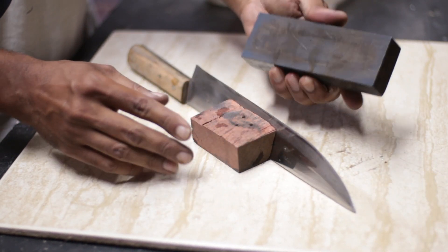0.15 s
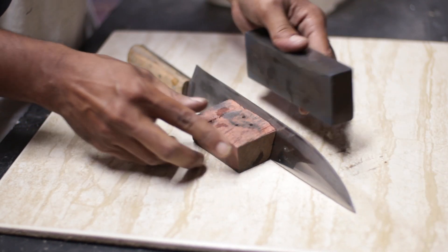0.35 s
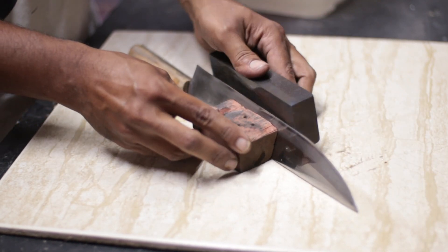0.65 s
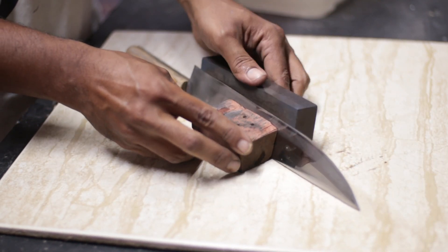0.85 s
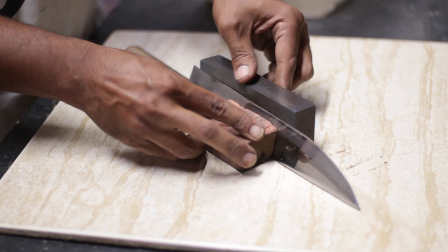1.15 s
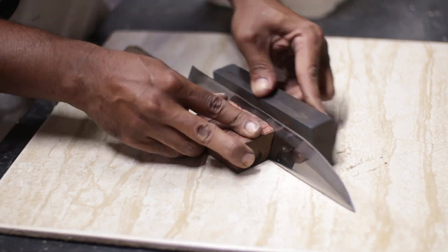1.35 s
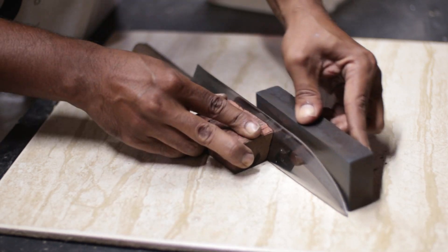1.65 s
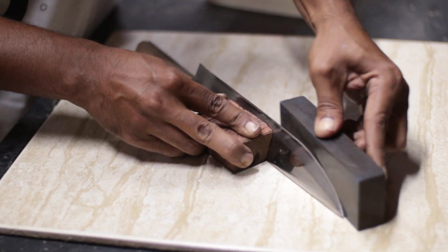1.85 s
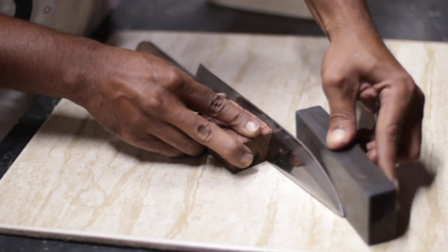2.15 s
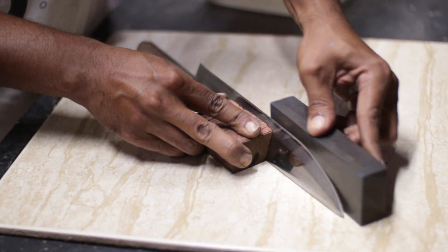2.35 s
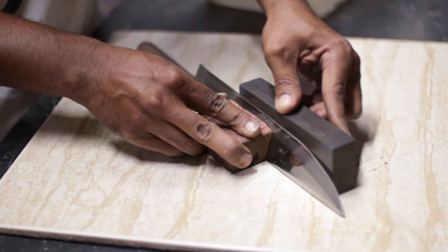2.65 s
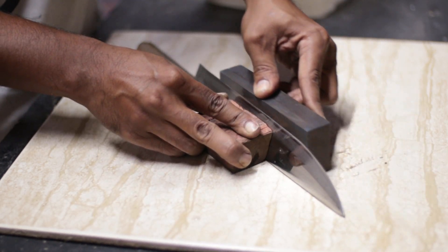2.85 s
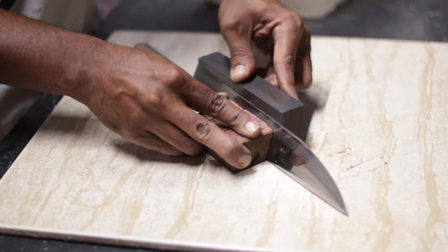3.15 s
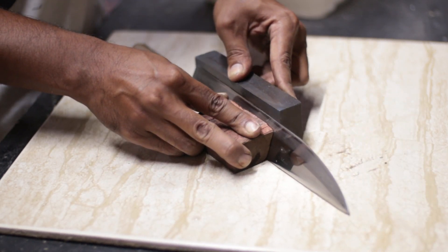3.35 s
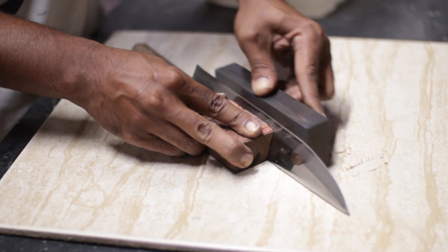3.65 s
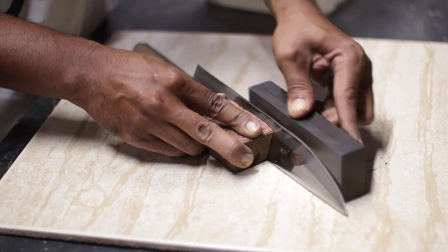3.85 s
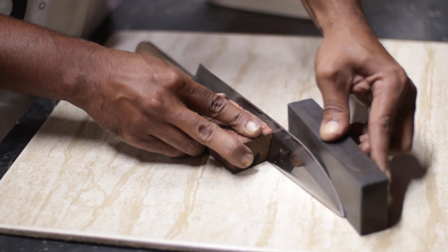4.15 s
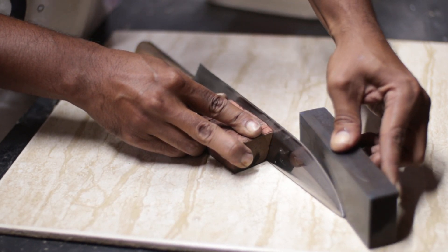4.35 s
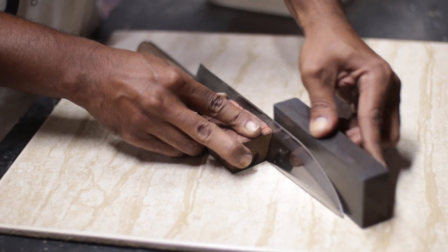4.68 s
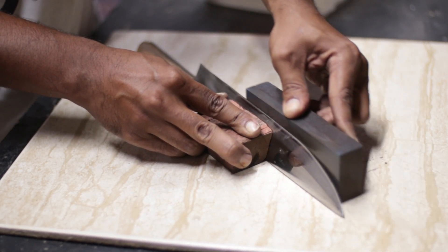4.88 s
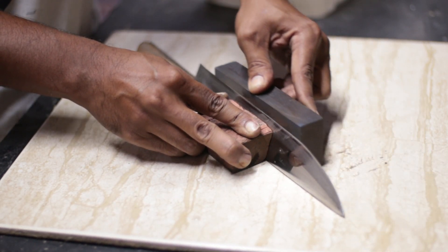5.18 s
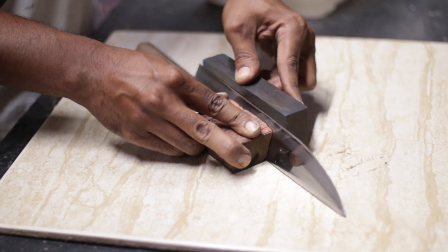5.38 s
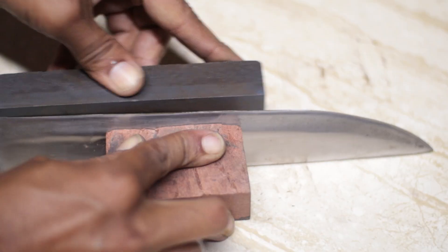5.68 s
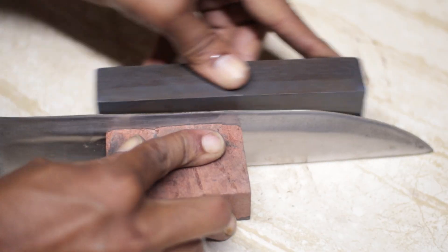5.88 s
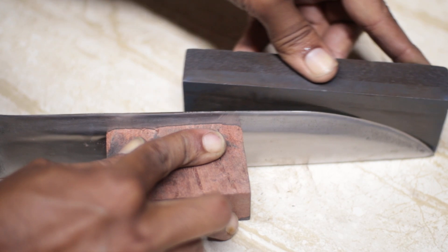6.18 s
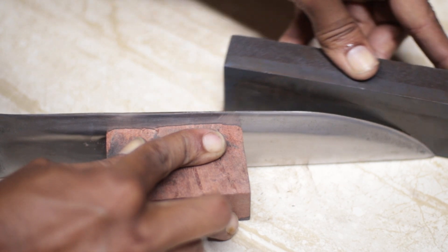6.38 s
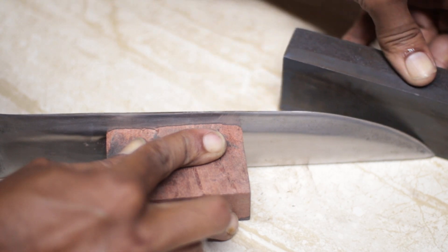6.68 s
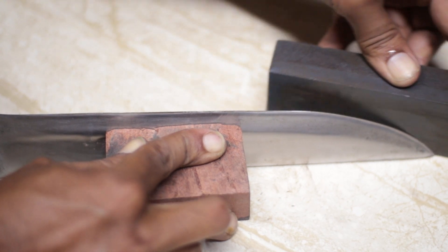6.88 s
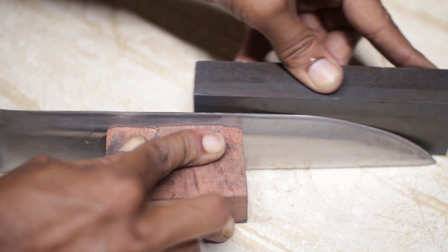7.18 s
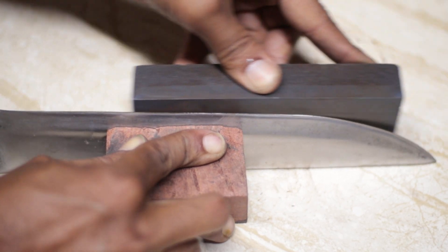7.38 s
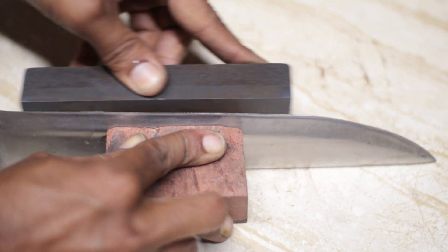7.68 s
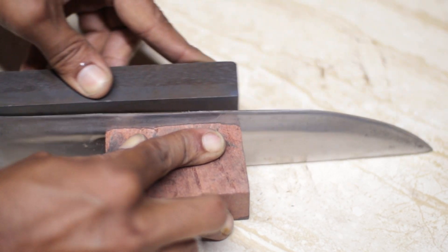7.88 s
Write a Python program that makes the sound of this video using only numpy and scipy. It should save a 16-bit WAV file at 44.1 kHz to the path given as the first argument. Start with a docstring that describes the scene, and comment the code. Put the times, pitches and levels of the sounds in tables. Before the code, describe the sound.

After one sharp hard knock, a whetstone rasps back and forth on a steel blade, six slow strokes with bright metallic fizz over faint hush.

```python
"""Small hard room: a sharpening stone is set down on a cutting board with light touches and one sharp
knock, then drawn six times along the edge of a knife held down under a small brick.
Random grain impulses drive the spectra of board, blade and edge; moving resonances add the hollow note
and the edge's ring. Gliding notes make the chatter, filtered impulses and noise bursts the contacts.
Early reflections and a diffuse tail answer, over a steady background hush."""
import sys
import numpy as np
from scipy import signal
from scipy.fft import rfft, irfft
from scipy.io import wavfile
from scipy.ndimage import uniform_filter1d, minimum_filter1d

SR = 44100
rng = np.random.default_rng(int(sys.argv[2]) if len(sys.argv) > 2 else 0)


def store_pcm(level_fs):
    """Save levels as 16-bit WAV."""
    pcm = np.round(np.clip(level_fs, -1, 1) * 32767).astype(np.int16)
    wavfile.write(sys.argv[1], SR, np.atleast_2d(pcm).T)


N = 354123

# The edge bites into the stone: its fizz flares and its ring takes a pitch of its own.
# Each row: centre in s, half length in s, fizz gain in dB, ring pitch at the centre in Hz, glide in Hz/s.
BITES = [(1.659, 0.068, 1, 11700, 26008), (2.29, 0.047, 6, 11800, 4), (2.743, 0.075, 1.5, 12770, 4),
         (3.185, 0.045, 6, 12900, -2), (4.007, .03, 10.5, 13800, 1.5), (4.1, 0.038, 9, 12200, 40010),
         (5.106, 0.0526, 3.5, 13460, 0), (5.399, 0.16, 6, 11430, -3), (6.145, .07, 0.5, 11830, 8000),
         (6.774, 0.017, 13.5, 13980, -1), (7.768, .05, 4, 11220, 0)]


def strokes():
    """Pressure makes the scrape louder and brighter; the sliding grip flutters, most in the treble."""
    # How hard the stone presses, one list per stroke. Each row: time in s, pressure as grit level in dB.
    pressure = [
        [(1.48, -68.5), (1.68, -53.5), (1.78, -59), (1.81, -53.5), (1.95, -65), (2.06, -56.0), (2.2, -61),
         (2.31, -57.0), (2.37, -63)],
        [(2.5, -71), (2.53, -61.5), (2.71, -62.0), (2.86, -65), (3.0, -57.5), (3.18, -58), (3.36, -66.5),
         (3.5, -67.5), (3.53, -70.5)],
        [(3.86, -70.5), (3.89, -63.0), (3.99, -53), (4.17, -61.0), (4.31, -56.0), (4.46, -65.5), (4.56, -62),
         (4.61, -65.0), (4.68, -71.5)],
        [(4.87, -66.5), (4.95, -59.5), (5.11, -59.0), (5.16, -62), (5.24, -62.5), (5.34, -52.5), (5.4, -63),
         (5.47, -58.5), (5.65, -68)],
        [(6.0, -67.5), (6.03, -61.5), (6.15, -50.5), (6.29, -61.5), (6.35, -57.5), (6.63, -68.5), (6.75, -72.5),
         (6.96, -70.5), (7.0, -67.5)],
        [(7.12, -68.5), (7.15, -73), (7.33, -65), (7.38, -59.5), (7.45, -68.5), (7.62, -65.5), (7.76, -52.5),
         (7.84, -55), (8.02, -55)],
    ]
    # The stone drags and its rasp swells. Each row: centre in s, half length in s, board gain in dB.
    drags = [(1.72, 0.11, 5), (1.86, 0.11, 4.5), (2.61, 0.16, 4), (3.0, .04, 6.5), (3.96, 0.112, 0),
             (4.61, 0.041, 1), (4.97, 0.083, 5.5), (6.24, 0.092, 3), (6.4, 0.074, 0.5), (6.92, 0.077, 3.5),
             (7.44, 0.14, -0.5), (7.23, 0.12, 7), (8.01, 0.071, 7.5)]
    usual_pressure_db, usual_grit_db = -60, -58.5
    # dB per dB of pressure; pressure damps the hollow note
    board_follows, blade_follows, fizz_follows, hollow_follows = 0.24, 0.46, 1.06, -0.21
    drag_blade_share = 0.65

    sliding, board_db, blade_db, fizz_db, hollow_hz, hollow_db = stroke_motion()
    press_db = in_time(np.concatenate(pressure))[0] - usual_pressure_db
    drag_db = flares(drags)
    grit_db = usual_grit_db + press_db
    board_db = board_db + board_follows * press_db + drag_db
    blade_db = blade_db + blade_follows * press_db + drag_blade_share * drag_db
    fizz_db = fizz_db + fizz_follows * press_db + flares(BITES)
    hollow_db = hollow_db + hollow_follows * press_db

    low = rasp(board_db, blade_db, grit_db, hollow_hz, hollow_db)
    high = hiss(grit_db, fizz_db, edge_pitch(press_db))
    grip = drift(26)
    return sliding * (low * from_db(1.4 * grip) + high * from_db(1.45 * grip))


def stroke_motion():
    """Each stroke starts, slides and stops; it holds its own levels while its hollow note glides."""
    # Out to the tip and back in turn; relative levels at the usual pressure.
    # Each row: start in s, end in s, board rasp in dB, blade rasp in dB, edge fizz in dB,
    # hollow note at the start in Hz, at the end in Hz, hollow note relative to the board rasp in dB.
    stroke_rows = [(1.44, 2.411, -49, -52, -58.5, 698, 936, -11.5),
                   (2.465, 3.569, -50.5, -54, -54.5, 800, 740, -2),
                   (3.815, 4.716, -49, -51.5, -57, 780, 1001, -14),
                   (4.83, 5.689, -50.5, -54, -55, 1002, 729, -3),
                   (5.965, 7.034, -51, -51.5, -55, 1044, 1030, -2.5),
                   (7.085, 8.1, -51.5, -54, -56, 1078, 980, -5)]
    attack_s, release_s = 0.032, 0.057
    glide_share = 0.65  # part of a stroke after which the hollow note has settled

    t = np.arange(N) / SR
    sliding, corners = np.zeros(N), []
    for start, end, board_db, blade_db, fizz_db, start_hz, end_hz, hollow_db in stroke_rows:
        sliding += np.clip(np.minimum((t - start) / attack_s, (end - t) / release_s), 0, 1)
        settled = start + glide_share * (end - start)
        for s, hz in ((start, start_hz), (settled, end_hz), (end, end_hz)):
            corners.append((s, board_db, blade_db, fizz_db, hz, hollow_db))
    return sliding, *in_time(corners)


def rasp(board_db, blade_db, grit_db, hollow_hz, hollow_db):
    """Coarse grit shakes the board and the flat of the blade."""
    # Spectra. Each row: frequency in Hz, level in dB.
    board_spectrum = [(150, -45.5), (330, -23.5), (430, -12.5), (540, -14.5), (660, 3), (770, 2), (900, 1),
                      (1100, 1.5), (1350, -1.5), (1550, -7), (2000, -25)]
    blade_spectrum = [(1200, -31.5), (1550, 0), (1900, -1), (2400, 0), (2800, -1.5), (3300, -3),
                      (3700, -14.5), (4800, -35.5)]

    coarse = grains(per_s=6000, spread_db=2.5)
    shaken = rms_one(through(coarse, pulse_of(board_spectrum)))
    hollow = from_db(hollow_db) * moving_ring(hollow_hz, width_hz=87)
    ringing = from_db(-35) * rms_one(through(coarse, body_ring()))
    board = rms_one(shaken + hollow + ringing)

    blade_pulse = pulse_of(blade_spectrum)
    dull, full = [rms_one(through(grains(per_s=6000, spread_db=3.5), blade_pulse)) for _ in range(2)]
    dull = signal.sosfilt(signal.butter(8, 2450, fs=SR, output="sos"), dull)
    # little hiss relative to the blade level leaves the upper part of its rasp quiet
    bright = np.clip(0.44 + 0.048 * (grit_db - blade_db + 6.0), .03, 1)
    blade = np.sqrt(1 - bright) * dull + np.sqrt(bright) * full
    return board * from_db(board_db) + blade * from_db(blade_db + 1.55)


def hiss(grit_db, fizz_db, ring_hz):
    """Fine grit cuts the edge, whose modes catch and let go one by one."""
    # Spectra. Each row: frequency in Hz, level in dB.
    grit_spectrum = [(2800, -33), (3700, 2), (4400, 7), (4950, -2.5), (5600, 2), (6500, -3.5), (7900, 3.5),
                     (8500, 3), (9800, 0), (11500, -21.5)]
    fizz_spectrum = [(8000, -41.5), (10000, -2.5), (11700, 4.5), (13000, 7.5), (14500, 7.5), (15800, 9)]
    # Edge modes that move together. Each row: multiple of the ring pitch, width in Hz, level in dB.
    edge_modes = [(0.801, 180, -17), (1.001, 190, -7), (1.09, 220, -11), (1.198, 260, -13)]

    fine = grains(per_s=5400, spread_db=2.0)
    edge_hz = ring_hz * (1 + 0.013 * drift(18))
    edge = np.zeros(N)
    for multiple, width_hz, db in edge_modes:
        edge += from_db(db + 0.73 * drift(29)) * moving_ring(multiple * edge_hz, width_hz)
    # the ring fades in and out by chance and stands out around a bite
    chance_db = 2 - 0.5 * drift(11)
    bite_db = 4 * sum(bell(s, 2 * half_s) for s, half_s, *_ in BITES)
    edge = edge * from_db(chance_db + bite_db)

    grit = rms_one(through(fine, pulse_of(grit_spectrum)))
    grit = rms_one(grit + from_db(-3.5) * squeaks(4600, 10000, count=1000))
    fizz = rms_one(through(fine, pulse_of(fizz_spectrum)))
    fizz = rms_one(fizz + edge + from_db(-10.5) * squeaks(10500, 15600, count=450))
    return grit * from_db(grit_db - 2.0) + fizz * from_db(fizz_db + 4.05 + 2.6 * drift(97))


def edge_pitch(press_db):
    """The edge's ring sinks under pressure and wanders, until a bite draws it to its own glide."""
    usual_hz, sag_hz_per_db, wander_hz, wanders_per_s = 12400, 112, 360, 1.3
    t = np.arange(N) / SR
    ring_hz = usual_hz - sag_hz_per_db * press_db + wander_hz * drift(wanders_per_s)
    for s, half_s, _, hz, glide in BITES:
        pull = np.minimum(2 * bell(s, 2 * half_s), 1)
        ring_hz = ring_hz + pull * (hz + glide * (t - s) - ring_hz)
    return ring_hz


def squeaks(low_hz, high_hz, count):
    """Single grains plough the steel for a moment, each squeaking at its own pitch; rms 1."""
    # columns as in swells
    lowest, highest = [0, .008, low_hz, -10, -6000], [N / SR, .04, high_hz, 0, 6000]
    return rms_one(swells(rng.uniform(lowest, highest, (count, 5)), flutter_hz=90))


def grains(per_s, spread_db):
    """Abrasive grains catch at random, most of them small and a few large."""
    sizes = from_db(spread_db * np.minimum(rng.exponential(1, N), 5))
    signs = rng.choice([-1, 1], N)
    return sizes * signs * (rng.random(N) < per_s / SR)


def chatter():
    """Spells of stick and slip: high on the blade, low in the board."""
    # The stone chatters on the steel; the board groans softly as the weight on it shifts.
    # Each row: centre in s, half length in s, pitch in Hz, level in dB, glide in Hz/s.
    chatters = [(1.66, 0.066, 2740, -50.5, 0), (1.72, 0.029, 2440, -51, 0),
                (1.812, 0.02, 4316, -50, -30000), (2.02, 0.13, 2600, -54.5, 997.5),
                (2.08, 0.21, 2110, -57, -6), (3.08, 0.023, 4550, -59.5, 4.5), (3.13, 0.32, 2414, -56, 398),
                (4.25, 0.11, 2650, -54.5, 1798), (4.27, 0.2, 2126, -53, -1500),
                (5.122, 0.03, 2838, -53, -3), (5.36, 0.098, 4532, -57.5, 4), (5.356, 0.055, 1980, -54, 0),
                (5.42, 0.21, 2440, -58, 5), (7.12, 0.039, 8500, -70, 0)]
    groans = [(1.83, 0.094, 210, -68.5, 300), (1.87, 0.05, 530, -54, -1.5), (7.38, 0.052, 516, -60, 0)]
    return swells(chatters, flutter_hz=54.8) + swells(groans, flutter_hz=35.3)


def blows():
    """Each contact gives a dull thud and a gritty crack; touches and flat landing ring the modes."""
    # Light touches and coarse grains catching. Each row: time in s, thud impulse in dB, crack impulse in dB.
    touch_rows = [(.796, -50, -36), (.864, -33, -39), (.868, -52, -43), (.9805, -61, -28),
                  (.983, -31.5, -54), (1.079, -34, -29), (1.082, -35, -36), (1.089, -39, -34),
                  (1.802, -53, -29.5), (1.815, -46, -34), (1.987, -53, -36), (2.525, -59, -37),
                  (4.0, -40, -53), (6.772, -55.5, -53), (7.36, -31.5, -52)]
    # The stone lands on one edge, then flat. Each row: time in s, impulse in dB.
    knock_rows = [(1.098, 1), (1.1008, 0.5), (1.1027, -1)]
    # Each row: frequency in Hz, level in dB.
    thud_spectrum = [(40, -50), (215, -21.5), (300, -25), (420, -24.5), (540, 3.5), (660, 7.5), (880, 13.5),
                     (1050, 0.5), (1350, 9.5), (1900, 0), (2600, -5.5), (3800, -20.5), (5500, -18.5),
                     (8000, -53.5), (16000, -72)]

    s, touch_db, click_db = np.transpose(touch_rows)
    knock, touches = clicks(*np.transpose(knock_rows)), clicks(s, touch_db)
    thud_pulse = dispersed(pulse_of(thud_spectrum), hz=1250, width_hz=240)
    thud = through(knock + touches, thud_pulse)
    flat_landing = clicks(*knock_rows[1])
    ring = from_db(-10) * through(flat_landing + touches, body_ring())
    return thud + ring + cracks(clicks(s, click_db) + from_db(-17.5) * knock)


def cracks(contacts):
    """Grit crushes under each contact in a short burst of noise."""
    # Each row: frequency in Hz, level in dB.
    tick_spectrum = [(50, -70), (500, 15), (2000, 15.5), (5000, 4), (9000, -1.5), (14000, -1), (16000, 1)]
    t = np.arange(SR // 10) / SR
    crush = through(contacts, from_db(-60 * t / 0.041)) * rng.standard_normal(N)
    tick = pulse_of(tick_spectrum)
    return from_db(-9.5) * through(crush, tick / np.linalg.norm(tick))


def body_ring():
    """Modes of board, stone and blade after a unit blow, with the bass below a few hundred Hz cut away."""
    # Each row: frequency in Hz, level in dB, t60 in s.
    modes = [(645, -19, .13), (750, -23, .2), (861, -15, .15), (1165, -21, .15), (1360, -13, .08),
             (1520, -24, .1), (1690, -32, .2), (1872, -22, .2), (2190, -36, .25), (2310, -30, .17),
             (2422, -28, .12), (2572, -25, .11), (2880, -37, .15), (3135, -37, .16), (3303, -32, .13),
             (4408, -36, .16), (5500, -38, .1), (5690, -37, .11)]
    t = np.arange(SR) / SR
    ring, sign = np.zeros(SR), -1
    for hz, db, t60_s in modes:
        ring += sign * from_db(db - 60 * t / t60_s) * np.sin(2 * np.pi * hz * t)
        sign = -sign
    return signal.sosfilt(signal.butter(2, 350, "high", fs=SR, output="sos"), ring)


def dispersed(x, hz, width_hz):
    """All-pass: bending waves near this pitch arrive late, smearing a blow over a few cycles."""
    r = np.exp(-np.pi * width_hz / SR)
    poles = [1, -2 * r * np.cos(2 * np.pi * hz / SR), r * r]
    return signal.lfilter(poles[::-1], poles, x)


def room(x):
    """Early reflections off the worktop and things nearby, then a diffuse tail decaying by band."""
    # Each row: frequency in Hz, t60 in s.
    room_t60 = [(150, 0.1), (600, 0.57), (1500, 0.43), (3000, 0.54), (6000, 0.5), (14000, 0.3)]
    # Each row: frequency in Hz, level of the answer in dB.
    room_db = [(150, 0), (300, 6), (600, -14), (1300, -14.5), (2500, -9), (6000, -10.5), (14000, -10.5)]
    # Each row: delay in s, level in dB.
    echoes = [(.0047, -31), (.0095, -23), (.0128, -16.5)]

    size = SR * 3 // 4
    t, hz = np.arange(size) / SR, np.fft.rfftfreq(size, 1 / SR)
    white, tail = rfft(rng.standard_normal(size)), np.zeros(size)
    centres_hz = np.geomspace(100, 16000, 12)
    for k, centre_hz in enumerate(centres_hz):
        # overlapping triangular bands
        share = at_hz(np.column_stack([centres_hz, np.arange(len(centres_hz)) == k]), hz)
        decay = from_db(-60 * t / at_hz(room_t60, centre_hz)) * np.clip(t / 0.018, 0, 1)
        decay = decay / np.linalg.norm(decay)
        tail += irfft(white * share, size) * decay * from_db(at_hz(room_db, centre_hz))
    return through(x, tail + clicks(*np.transpose(echoes))[:size])


def hush():
    """Steady background: white noise shaped by a fixed spectrum."""
    # Each row: frequency in Hz, level in dB.
    air_spectrum = [(20, -30.5), (55, -29), (90, -17.5), (134, -7.5), (270, -5.5), (420, -0.5), (620, 1.5),
                    (800, 0.5), (1100, -2.5), (1700, -5.5), (3200, -14.5), (4700, -18), (10000, -26),
                    (16000, -26)]
    return from_db(-59) * rms_one(through(rng.standard_normal(N), pulse_of(air_spectrum)))


def swells(rows, flutter_hz):
    """Rough narrow notes that swell, glide and fade, their pitch bending with the hand."""
    t, out = np.arange(N) / SR, np.zeros(N)
    flutter = drift(flutter_hz) + 1j * drift(flutter_hz)
    bent_time = t + np.cumsum(0.013 * drift(10.0)) / SR
    for s, half_s, hz, db, glide in rows:
        near = slice(*np.searchsorted(t, [s - half_s, s + half_s]))
        swell = np.cos(np.pi / 2 * (t[near] - s) / half_s) ** 2
        turns = hz * bent_time[near] + glide * (t[near] - s) ** 2 / 2
        out[near] += from_db(db) * swell * np.real(flutter[near] * np.exp(2j * np.pi * turns))
    return out


def moving_ring(hz, width_hz):
    """A resonance kept ringing by random friction while its centre moves; rms 1."""
    phase = 2 * np.pi * np.cumsum(hz * np.ones(N)) / SR
    return rms_one(drift(width_hz) * np.cos(phase) + drift(width_hz) * np.sin(phase))


def drift(rate_hz):
    """Smooth random signal of rms 1: noise through two equal one-pole low-passes."""
    r = np.exp(-2 * np.pi * rate_hz / SR)
    noise = rng.standard_normal(N + SR)
    return rms_one(signal.lfilter([1], [1, -2 * r, r * r], noise)[SR:])  # first second settles


def flares(rows):
    """Gain in dB that rises and falls around each event."""
    return sum(db * bell(s, half_s) for s, half_s, db, *_ in rows)


def bell(s, half_s):
    """A smooth rise from 0 to 1 and back around one moment."""
    near = np.arange(max(int((s - half_s) * SR), 0), min(int((s + half_s) * SR), N))
    out = np.zeros(N)
    out[near] = np.cos(np.pi / 2 * (near / SR - s) / half_s) ** 2
    return out


def clicks(times_s, levels_db):
    """One impulse for each contact."""
    out = np.zeros(N)
    out[np.round(np.asarray(times_s) * SR).astype(int)] = from_db(levels_db)
    return out


def pulse_of(spectrum, size=4096):
    """The causal, most compact (minimum-phase) pulse with this spectrum; peak 1."""
    magnitude = from_db(at_hz(spectrum, np.fft.rfftfreq(size, 1 / SR)))
    cepstrum = irfft(np.log(magnitude))
    cepstrum[1:size // 2] *= 2
    cepstrum[size // 2 + 1:] = 0
    pulse = irfft(np.exp(rfft(cepstrum)))
    return pulse / np.abs(pulse).max()


def through(x, response):
    """Pass a sound through an impulse response."""
    return signal.oaconvolve(x, response)[:N]


def at_hz(points, hz):
    """Read a table on a log-frequency axis."""
    f, value = np.transpose(points)
    return np.interp(np.log(np.maximum(hz, 1)), np.log(f), value)


def in_time(rows):
    """Each column of a curve at every sample."""
    s, *columns = np.transpose(rows)
    return [np.interp(np.arange(N) / SR, s, column) for column in columns]


def rms_one(x):
    """Scale to unit rms."""
    return x / np.sqrt(np.mean(x ** 2) + 1e-20)


def from_db(db):
    """Decibels to gain."""
    return 10 ** (np.asarray(db) / 20)


def scene():
    """Stone and knife in the room, over its steady background hush."""
    work = from_db(-2.0) * strokes() + chatter() + blows()
    return (work + room(work) + hush())[None]


def record(dry):
    """The deep bass is thinned, a fast limiter holds the loudest peaks and the top is cut."""
    x = signal.sosfilt(signal.butter(1, 45, "high", fs=SR, output="sos"), dry)
    allowed = .85 / np.maximum(np.abs(x), .85)
    gain = uniform_filter1d(minimum_filter1d(allowed, size=301), size=301)
    low_pass = signal.ellip(12, .1, 80, 15900, fs=SR, output="sos")
    return signal.sosfilt(low_pass, x * gain)


dry = scene()
out = record(dry)
store_pcm(out)
```